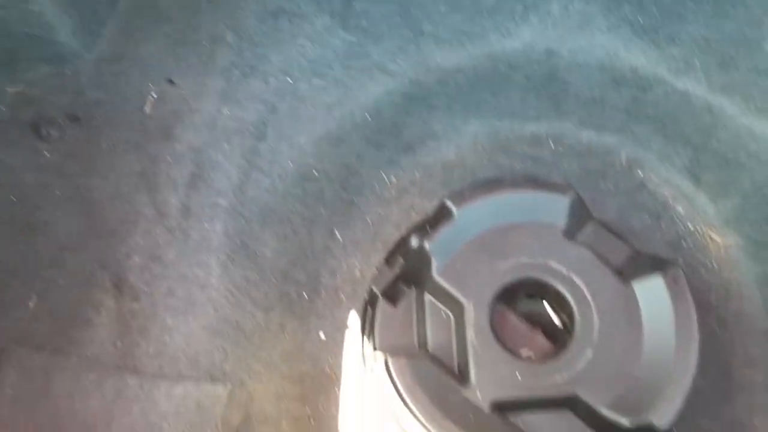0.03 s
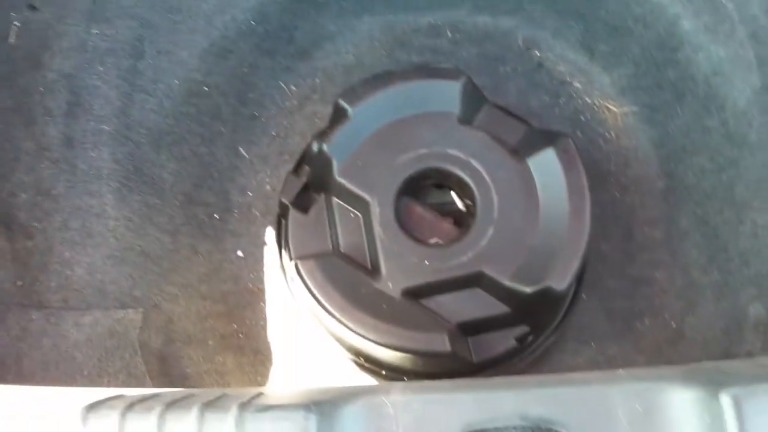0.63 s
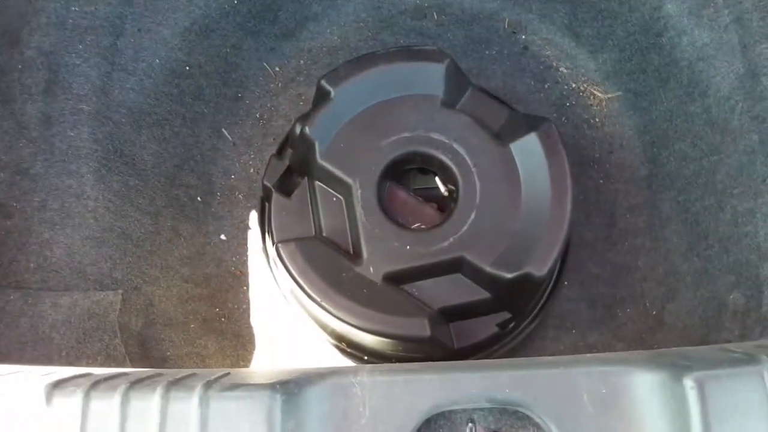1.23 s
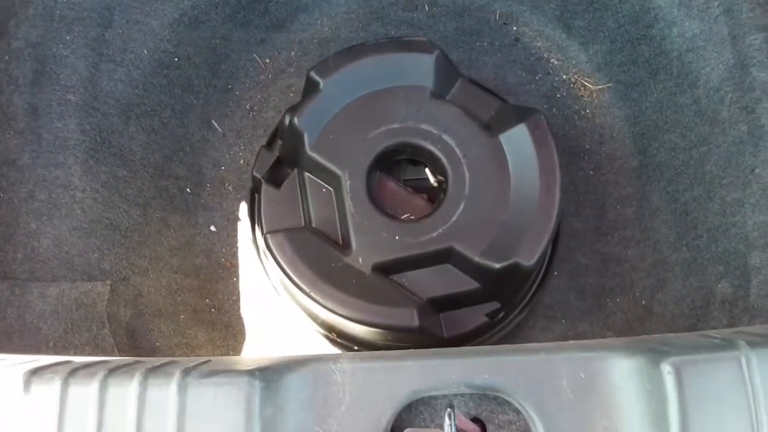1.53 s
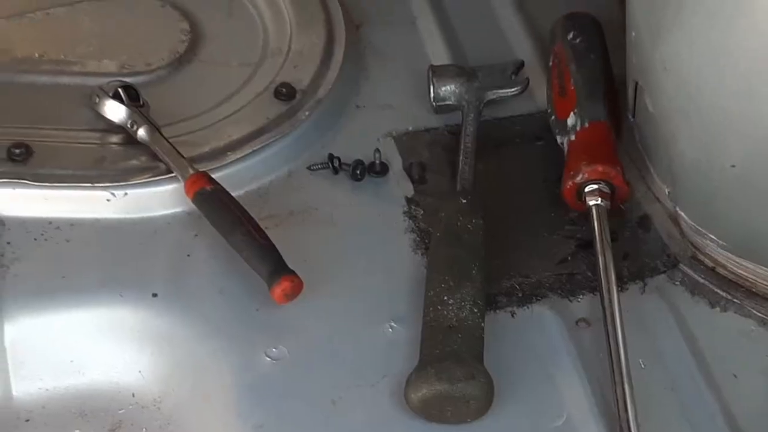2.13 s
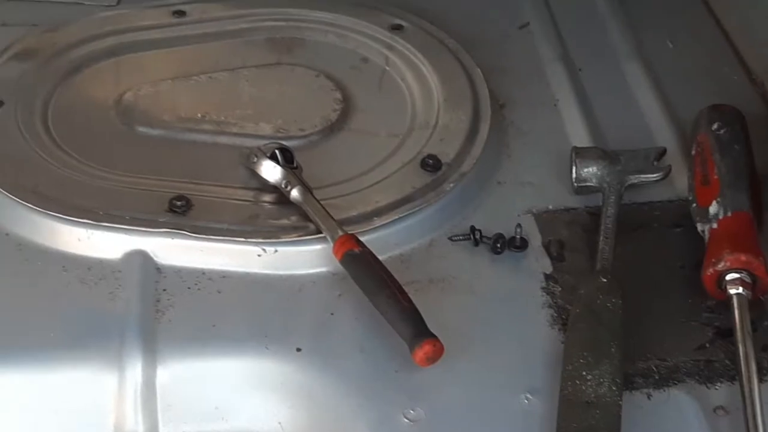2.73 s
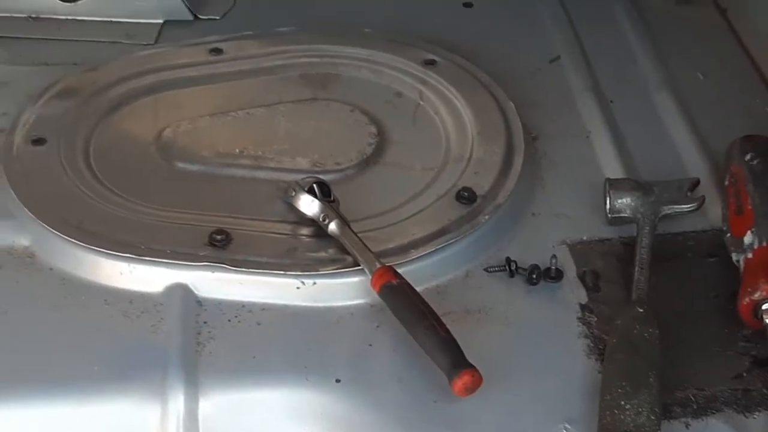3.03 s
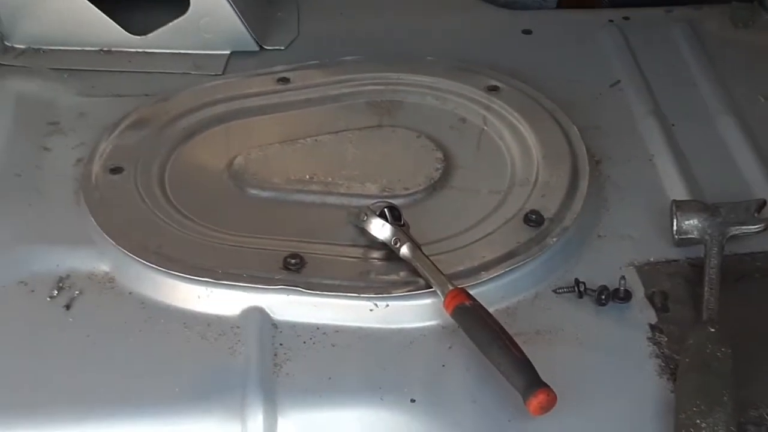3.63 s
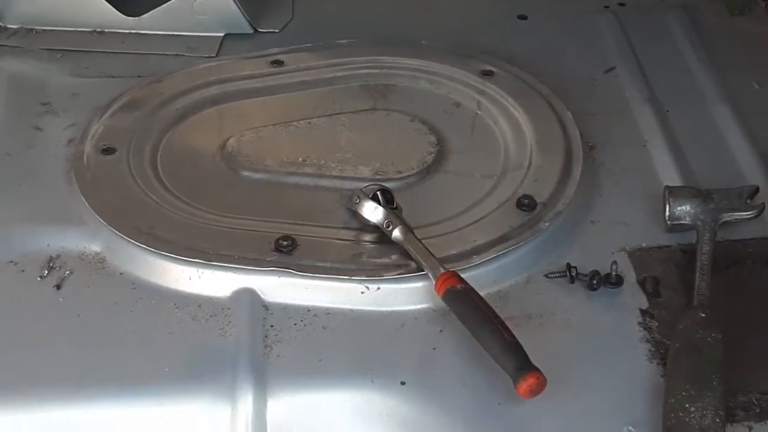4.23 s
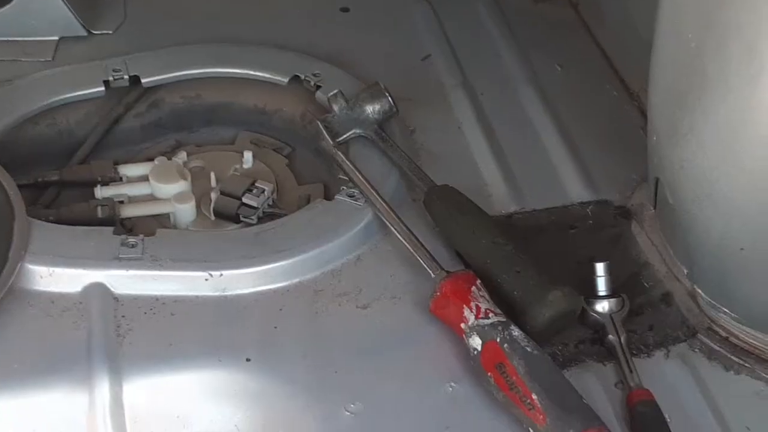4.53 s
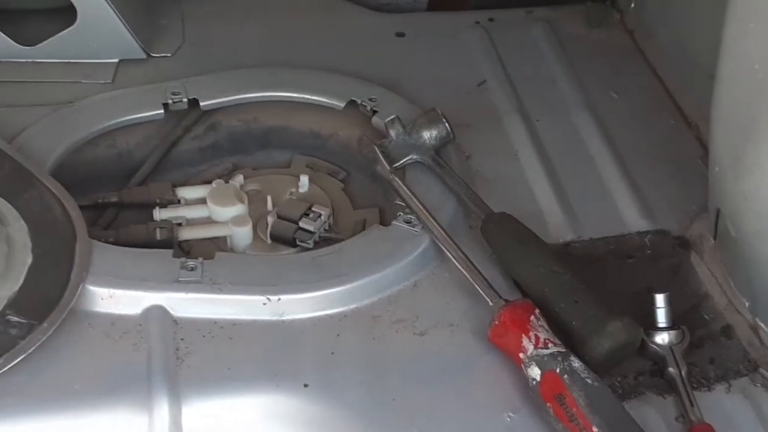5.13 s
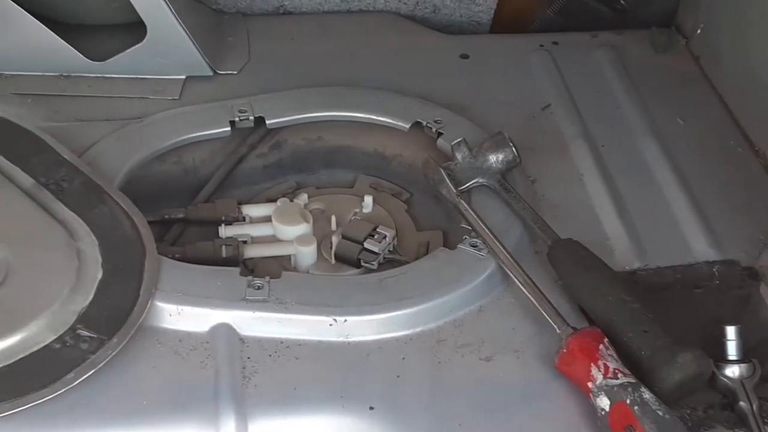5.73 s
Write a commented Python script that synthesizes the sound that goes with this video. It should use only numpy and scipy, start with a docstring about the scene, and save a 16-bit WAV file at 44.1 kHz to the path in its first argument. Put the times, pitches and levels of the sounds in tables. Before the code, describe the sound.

Outdoors, wind buffets the microphone in uneven low puffs and thumps while fingers rub softly on its case. After a brief dropout it is much quieter: distant traffic rumbles, a far car passes and a songbird whistles faintly over light leaf rustle and hiss. A few small puffs and a faint click lead to another dropout, then the bird's slurred chirps come through more clearly.

```python
"""Outdoors at the open boot of a parked car, heard in three stretches joined by brief near-silences.
Distant traffic rumbles, one car passes, leaves rustle and two microphones hiss. In the second and third
stretches a songbird's slurred whistles echo among the trees. Fingers slide on the microphones' case in
the first. Of a few faint, dry clicks, one sounds as the second stretch cuts off. Loudest is the wind:
its turbulent eddies churn and puff against the two microphone ports as fluctuations of pressure."""
import sys
import numpy as np
from scipy import signal
from scipy.fft import rfft, irfft, next_fast_len
from scipy.io import wavfile
from scipy.ndimage import uniform_filter1d, map_coordinates

SR = 44100
rng = np.random.default_rng(int(sys.argv[2]) if len(sys.argv) > 2 else 0)


def master(y):
    """Save y as 16-bit WAV."""
    cut = np.clip(np.atleast_2d(y).T, -1, 1)
    pcm = np.round(cut * 32767)  # scale
    wavfile.write(sys.argv[1], SR, pcm.astype(np.int16))


N = 259749

# The stretches of sound. Each row: start and end in seconds.
STRETCHES = [(-.01, 1.907), (1.943, 4.3), (4.357, 5.9)]
# Response of the microphone ports. Each row: frequency in Hz, gain in dB.
PORT_RESPONSE = [(20, -23.5), (50, 1), (90, 2), (250, -5), (420, -1), (650, -1.5), (850, -4.5), (1150, -2),
                 (1700, -7), (3000, -4.5)]
# Spectrum of rubbing skin and of air forced through the ports. Each row: frequency in Hz, gain in dB.
FRICTION_SPECTRUM = [(600, -8), (1800, 3.5), (2600, -1.5), (4000, -8), (9000, -29.5), (15000, -29.5)]
# Gusts. Each row: start and length in seconds, level in dB, eddy rate in Hz, left minus right in dB.
GUSTS = [(0, 0.17, -35, 228, 12), (0.171, 0.13, -34, 190, 5), (0.309, 0.057, -41, 150, -13),
         (0.462, 0.15, -48.5, 173, 3.5), (0.699, .21, -47, 115, -27), (0.903, 0.29, -42.5, 139, 2),
         (1.192, 0.075, -41, 160, 13), (1.271, 0.12, -43.5, 408, 16), (1.385, 0.055, -36.5, 124, -1),
         (1.585, 0.058, -28, 478, -6), (1.6, .148, -30, 292, 9.5), (1.77, .065, -33.5, 186, 0),
         (1.88, 0.037, -49.5, 258, 3), (3.91, .052, -37.5, 147, 24), (4.17, 0.14, -43.5, 106, 30)]


def amp(db):
    """Amplitude ratio of a level in decibels."""
    return 10 ** (np.asarray(db) / 20)


def unit(x):
    """Normalisation to an rms of 1."""
    return x / np.sqrt(np.mean(x ** 2) + 1e-20)


def along(points, hz):
    """Interpolation of (Hz, value) points on a logarithmic frequency axis."""
    f, v = np.transpose(points)
    return np.interp(np.log(hz + 1), np.log(f + 1), v)


def envelope(points):
    """Gain at each sample, interpolated between (seconds, dB) points."""
    return amp(np.interp(np.arange(N) / SR, *np.transpose(points)))


def wobble(rate):
    """Smooth random modulation: a spline with `rate` knots a second."""
    return map_coordinates(rng.standard_normal(int(N * rate / SR) + 4), [np.arange(N) * rate / SR])


def filtered(x, response):
    """Linear filtering: the spectrum times a frequency response."""
    n = x.shape[-1]
    m = next_fast_len(n + n // 8)
    return irfft(rfft(x, m) * response(np.fft.rfftfreq(m, 1 / SR)), m)[..., :n]


def coloured(x, spectrum):
    """Spectral shaping by (Hz, dB) points."""
    return filtered(x, lambda hz: amp(along(spectrum, hz)))


def relax(x, settle_s):
    """First-order lag with time constant settle_s."""
    keep = np.exp(-1 / (settle_s * SR))
    return signal.lfilter([1 - keep], [1, -keep], x)


def add(track, sound, s):
    """Superposition of a sound on a stereo track, centred at s seconds."""
    n = sound.shape[-1]
    start = round(s * SR) - n // 2
    a, b = max(start, 0), min(start + n, N)
    if b > a:
        track[:, a:b] += sound[..., a - start:b - start]


def panned(pan_db):
    """Constant-power gains, the left pan_db above the right."""
    gains = amp(np.array([pan_db, -pan_db]) / 2).reshape(2, -1)
    return gains / np.sqrt(np.mean(gains ** 2, axis=0))


def diffuse_noise(spectrum, patchy_db):
    """A diffuse field, patchy in time and frequency: only long waves reach both ports alike."""
    # Likeness of left and right. Each row: frequency in Hz, correlation.
    coherence = [(60, 0.81), (200, 0.79), (480, 0.61), (950, 0.14), (1900, -0.012), (3800, -0.037),
                 (8000, -0.031)]
    cells = signal.stft(rng.standard_normal((2, N)), nperseg=1024)[2]
    patches = uniform_filter1d(rng.standard_normal(cells.shape[1:]), size=6, axis=0)
    patches = unit(uniform_filter1d(patches, size=10, axis=1))
    pair = signal.istft(cells * amp(patchy_db * patches), nperseg=1024)[1][:, :N]
    turn = lambda hz: np.arccos(np.clip(along(coherence, hz), -1, 1)) / 2
    mid, side = filtered(pair, lambda hz: amp(along(spectrum, hz)) * [np.cos(turn(hz)), np.sin(turn(hz))])
    return unit(np.array([mid + side, mid - side]))


def microphone_hiss(db):
    """Self-noise, independent in each microphone."""
    # The noise floor. Each row: frequency in Hz, spectral density in dB.
    spectrum = [(2000, -19), (5000, -5), (7000, -19), (8500, -21), (9800, -8), (11000, -0.5), (12500, 2),
                (15700, 3.5)]
    return amp(db) * panned(-1.5) * unit(coloured(rng.standard_normal((2, N)), spectrum))


def leaves(db):
    """Rustling leaves: many small incoherent sources sum to broadband noise."""
    # The rustle. Each row: frequency in Hz, spectral density in dB.
    spectrum = [(300, -9.5), (800, 10), (1300, 3), (2000, -2.5), (3000, -5), (4700, -8.5), (6000, -14.5),
                (8000, -24), (12000, -40)]
    return amp(db) * diffuse_noise(spectrum, patchy_db=1.1)


def traffic(rumble_db, roar_db, pass_s=3.205, half_width_s=0.32, pass_db=-53.5):
    """Far engines and tyres; a passing car, being incoherent with them, adds its tyre noise in power."""
    # Engine and tyre noise. Each row: frequency in Hz, spectral density in dB.
    engines = [(15, -38.5), (35, -16), (50, -7.5), (68, 1), (100, -9), (160, -15.5), (300, -30.5),
               (900, -60)]
    tyres = [(50, -32.5), (130, 4), (230, 2), (370, 2.5), (520, -5.5), (690, -4), (900, -16), (1300, -35.5),
             (2500, -42), (6000, -74.5)]
    nearness = 1 / (1 + ((np.arange(N) / SR - pass_s) / half_width_s) ** 2)
    rumble = amp(rumble_db + 0.6 * wobble(12)) * diffuse_noise(engines, patchy_db=1)
    roar = np.hypot(amp(roar_db), nearness * amp(pass_db)) * diffuse_noise(tyres, patchy_db=1.5)
    return rumble + roar


def background():
    """Ambient noise, its base levels held through each stretch."""
    # One row to a stretch. Each row: rumble, tyre roar, leaves and hiss levels in dB.
    levels = [(-56, -56.5, -68, -65.5), (-55, -58, -69, -67.5), (-63.5, -62, -68.5, -69)]
    stretch = np.searchsorted([start for start, _ in STRETCHES], np.arange(N) / SR) - 1
    rumble_db, roar_db, leaves_db, hiss_db = np.transpose(levels)[:, stretch]
    return traffic(rumble_db, roar_db) + leaves(leaves_db) + microphone_hiss(hiss_db)


def reverberation(x, t60):
    """Scattered echoes, different at each port, decay by 60 dB in t60 seconds."""
    t = np.arange(SR // 2) / SR
    tail = rng.standard_normal((2, len(t))) * amp(-60 * t / t60)
    return signal.fftconvolve(x, tail / np.linalg.norm(tail, axis=1, keepdims=True), axes=1)[:, :N]


def bird(climb_hz_per_s=4400, drop_hz_per_s=26000, rounding_s=0.004):
    """Frequency modulation: each quavering whistle climbs, rounds off and drops, heard from the left."""
    # Syllables. Each row: crest time in seconds, crest pitch in Hz, rise and fall in seconds, level in dB.
    song = [(2.0, 2700, 0.015, .016, -72.5), (2.146, 4000, 0.011, .03, -72.5),
            (2.21, 3650, 0.011, .02, -78), (2.3, 3230, 0.027, 0.028, -70.5),
            (2.395, 2840, 0.0077, 0.023, -67), (2.513, 3130, 0.01, .04, -66.5),
            (2.632, 3170, 0.0075, .04, -65.5), (2.754, 3155, 0.0088, .04, -66.5),
            (4.563, 4135, 0.022, 0.0059, -55.5), (4.566, 3640, .016, 0.029, -59.5),
            (4.585, 4280, 0.0091, 0.0074, -63), (4.605, 3800, .012, 0.0047, -62),
            (4.613, 3344, 0.023, 0.037, -60), (4.922, 3790, 0.014, .03, -67),
            (5.04, 3990, 0.015, 0.031, -64), (5.149, 2280, 0.017, .012, -69.5),
            (5.224, 3940, 0.038, 0.035, -65.5), (5.342, 3560, 0.012, 0.017, -56.5),
            (5.388, 2940, 0.0068, 0.019, -53), (5.477, 4510, .016, 0.05, -54.5),
            (5.544, 4060, 0.018, 0.01, -47.5), (5.69, 3820, 0.045, 0.043, -55),
            (5.748, 3194, 0.01, 0.042, -54), (5.816, 2830, 0.02, 0.0076, -48.5),
            (5.874, 3640, 0.011, 0.039, -55)]
    # Strength of the far echo. Each row: time in seconds, gain in dB.
    echo = [(2.9, 3), (4.4, -2.5), (5.3, -4), (5.5, -9.5)]
    out, quaver = np.zeros((2, N)), wobble(500)
    for s, crest_hz, rise, fall, db in song:
        t = np.arange(-rise, fall, 1 / SR)
        slope = np.where(t < 0, climb_hz_per_s, drop_hz_per_s)
        hz = crest_hz - slope * (np.hypot(t, rounding_s) - rounding_s)
        shake = np.roll(quaver, -round(s * SR))[:len(t)]
        phase = 2 * np.pi * np.cumsum(hz * (1 + 0.021 * shake)) / SR
        swell = np.sin(np.pi * (t + rise) / (rise + fall))
        add(out, amp(db + 2 * shake) * swell * np.sin(phase), s + (fall - rise) / 2)
    direct = np.array([out[0], np.roll(out[1], round(0.0005 * SR))])
    boot = reverberation(out, t60=0.033)  # reflections in the open boot break up the glides
    trees = reverberation(out * envelope(echo), t60=0.24)
    return (direct + 0.5 * boot + trees) * panned(2.5)


def ticks(size=512):
    """Broadband transients: faint, dry clicks; one sounds as the second stretch cuts off."""
    # Clicks. Each row: time in seconds, relative level in dB.
    clicks = [(1.753, -49.5), (4.144, -62), (4.3002, -52), (5.4754, -61.5)]
    # Spectrum of the clicks. Each row: frequency in Hz, gain in dB.
    spectrum = [(1500, -24), (4000, 13.5), (6500, -19), (9000, 3), (12000, 2), (16000, -13)]
    out, t = np.zeros((2, N)), (np.arange(size) - size // 2) / SR
    for s, db in clicks:
        snap = rng.standard_normal((2, size)) * np.exp(-abs(t) / 0.00085)
        add(out, amp(db - 2.5) * coloured(snap, spectrum), s)
    return out


def fingers(skin_db=-15.5):
    """Friction of skin on the case hisses and excites the cavity resonances of the cupped hand."""
    # The slide. Each row: time in seconds, level in dB.
    slide = [(0, -71), (.3, -59.5), (.5, -55.5), (.68, -59.5), (.8, -67), (1.15, -63), (1.3, -61),
             (1.55, -59.5), (1.85, -57.5), (1.95, -100)]
    # Modes of the cavity. Each row: frequency and bandwidth in Hz, gain in dB.
    modes = [(477.5, 22, 14), (796, 160, -17), (1240, 220, -16.5), (2550, 370, -16.5), (3700, 600, -18.5)]
    cavity = lambda hz: sum((-1) ** k * amp(db) * 1j * hz * width / (f ** 2 - hz ** 2 + 1j * hz * width)
                            for k, (f, width, db) in enumerate(modes))
    skin = unit(coloured(rng.standard_normal((2, N)), FRICTION_SPECTRUM))
    ring = unit(filtered(rng.standard_normal((2, N)), cavity))
    return envelope(slide) * (ring + amp(skin_db) * skin)


def turbulence(n, centre_hz, steep, shared_hz):
    """Turbulent pressure peaks near the eddy rate; only large, slow eddies cover both ports."""
    own, common = rng.standard_normal((2, n)), rng.standard_normal(n)
    share = lambda hz: 1 / (1 + (hz / shared_hz) ** 2)
    rise = lambda hz: hz ** 2 / (hz ** 2 + (0.35 * centre_hz) ** 2)
    hump = lambda hz: rise(hz) / np.sqrt(1 + (hz / (1.37 * centre_hz)) ** (2 * steep))
    small = filtered(own, lambda hz: hump(hz) * np.sqrt(1 - share(hz)))
    large = filtered(common, lambda hz: hump(hz) * np.sqrt(share(hz)))
    return small + large


def gust_envelope(length, size, rise_s=0.01, fall_s=0.01):
    """Exponential growth, a plateau and exponential decay, centred in the array."""
    t = (np.arange(size) - size // 2) / SR + length / 2
    return np.exp(np.minimum(t - rise_s, 0) / rise_s - np.maximum(t - length + fall_s, 0) / fall_s)


def breeze(size=16384):
    """Decaying turbulence: weaker, lumpy buffeting trails each gust."""
    strength = np.zeros((2, N))
    for start, length, db, _, pan_db in GUSTS:
        add(strength, amp(db - 12) * panned(pan_db) * gust_envelope(length, size), start + length / 2)
    lumps = amp(5 * np.array([wobble(30), wobble(30)]))
    buffet = unit(lumps * turbulence(N, centre_hz=148, steep=4.0, shared_hz=80))
    return relax(strength, settle_s=0.044) * panned(2) * buffet


def port_hiss(pressure):
    """Flow noise follows squared pressure, so only a hard, lasting blow makes the ports hiss."""
    flow = relax(np.mean(pressure ** 2, axis=0), settle_s=0.0075)
    grit = amp(3 * wobble(400)) * rng.standard_normal((2, N))
    return amp(-21.5) * flow * panned(1) * unit(coloured(grit, FRICTION_SPECTRUM))


def churn(size=16384):
    """Vortex shedding: each gust is a lumpy stream of small eddies at its own rate."""
    out, lumps = np.zeros((2, N)), unit(amp(2.5 * wobble(110)))
    for start, length, db, centre_hz, pan_db in GUSTS:
        eddies = unit(coloured(turbulence(size, centre_hz, steep=3.12, shared_hz=62.3), PORT_RESPONSE))
        add(out, amp(db) * panned(pan_db) * eddies * gust_envelope(length, size), start + length / 2)
    return out * lumps


def eddy(size, centre_hz, lag_spread_s):
    """Convection carries one smooth pressure swing to the two ports at slightly different moments."""
    hz = np.fft.rfftfreq(size, 1 / SR)
    phase = rng.uniform(0, 2 * np.pi) + 2 * np.pi * hz * lag_spread_s * rng.standard_normal((2, 1))
    spectrum = (hz / centre_hz) ** 3 * np.exp(-2.2 * (hz / centre_hz) ** 1.278)
    return np.fft.fftshift(irfft(spectrum * np.exp(1j * phase), size), axes=1)


def puffs(size=4096):
    """Eddy scale sets duration: small, fast puffs are mostly one swing; large ones linger and break up."""
    # Strong eddies. Each row: time in seconds, level in dB, centre in Hz, left minus right in dB.
    strikes = [(0.021, -19, 273, 4.5), (.056, -23, 340, 8), (.078, -23.5, 310, 1), (.088, -26.5, 430, -8),
               (.093, -27, 458, 9), (.101, -23, 320, 3), (.176, -31.5, 373, 0.5), (.197, -25, 287, 3),
               (0.219, -24, 111, 2), (.25, -27.5, 203, -5), (.272, -26.5, 178, 0), (.288, -39.5, 333, 6),
               (0.932, -36.5, 100, -11), (0.954, -39, 115, 0), (1.052, -33.5, 114, 1),
               (1.193, -19.5, 366, -4), (1.201, -23.5, 385, 8), (1.211, -27, 386, -11),
               (1.283, -35, 440, 19), (1.342, -40, 520, 16), (1.375, -37, 466, 17), (1.403, -32, 121, -18),
               (1.592, -22.5, 530, -23.5), (1.598, -17.5, 520, -2), (1.602, -14, 440, 4),
               (1.609, -19, 382, 3.5), (1.618, -27.5, 925, -8), (1.634, -25.5, 326, 12),
               (1.659, -18.5, 420, -0.5), (1.692, -27, 535, -10.5), (1.7, -20.5, 210, 1.5),
               (1.717, -22, 387, -4.5), (1.729, -20, 305, 7), (1.777, -30.5, 147, 5.5),
               (1.797, -28.5, 268, -9), (3.67, -34, 111, -36), (3.928, -26, 223, 30), (4.079, -33, 106, 27)]
    out, t = np.zeros((2, N)), (np.arange(size) - size // 2) / SR
    for s, db, centre_hz, pan_db in strikes:
        half_length_s = 0.0032 * (323 / centre_hz) ** 0.53
        swell = 1 / np.cosh(t / half_length_s)
        swirl = unit(swell * turbulence(size, centre_hz, steep=3.5, shared_hz=59))
        core = unit(eddy(size, centre_hz, lag_spread_s=0.000997)) * 0.003 / half_length_s
        push = coloured(swirl + core, PORT_RESPONSE)
        push *= np.sqrt(np.sum(swell ** 2) / np.sum(push ** 2, axis=1, keepdims=True))  # swell's energy
        add(out, amp(db) * panned(pan_db) * push, s)
    return out


def scene():
    """Superposition of close wind and fingers on the quiet outdoors."""
    wind = churn() + puffs()
    return wind + port_hiss(wind) + breeze() + fingers() + background() + bird() + ticks()


def record(dry, floor_db=-31.5, top_hz=15820):
    """Gating and band limiting: the level drops between stretches, and the highest treble is cut."""
    t = np.arange(N) / SR
    sounding = sum((t >= start) & (t < end) for start, end in STRETCHES)
    gate = uniform_filter1d(sounding.astype(float), size=32)
    return filtered(dry * np.maximum(gate, amp(floor_db)), lambda hz: hz < top_hz)


dry = scene()
out = record(dry)
master(out)
```